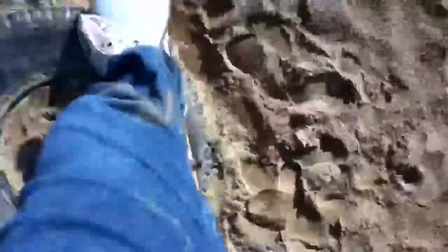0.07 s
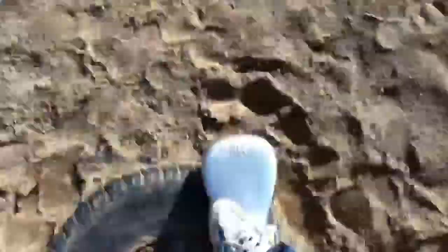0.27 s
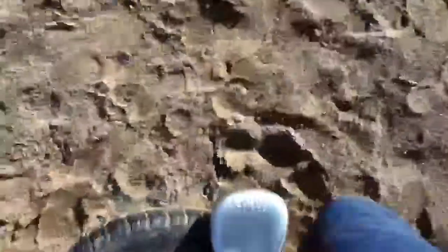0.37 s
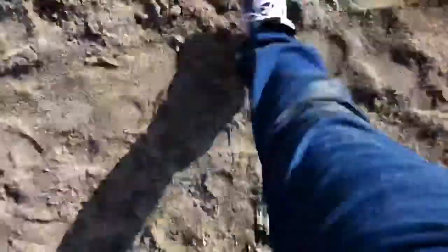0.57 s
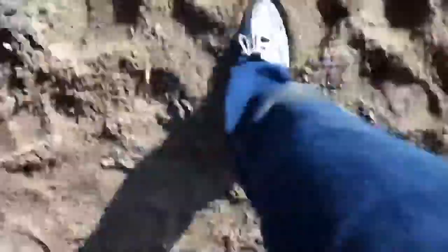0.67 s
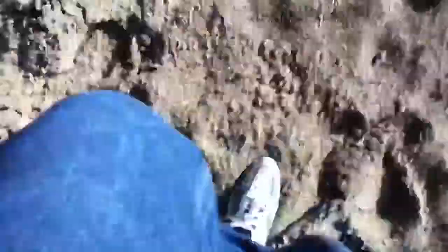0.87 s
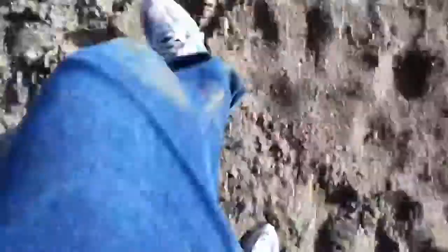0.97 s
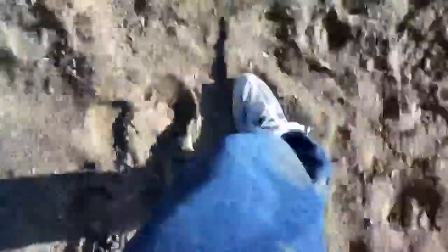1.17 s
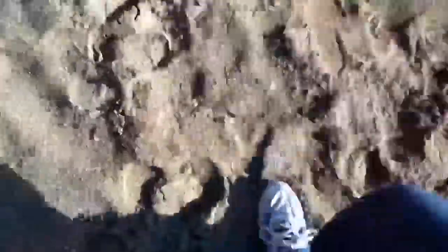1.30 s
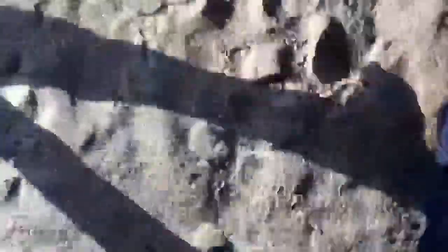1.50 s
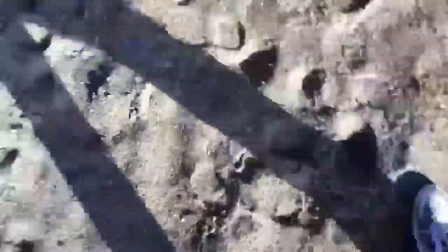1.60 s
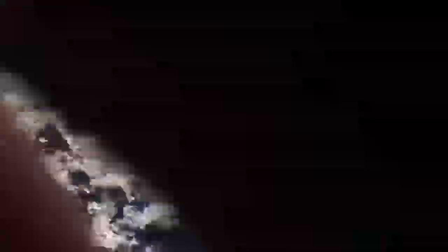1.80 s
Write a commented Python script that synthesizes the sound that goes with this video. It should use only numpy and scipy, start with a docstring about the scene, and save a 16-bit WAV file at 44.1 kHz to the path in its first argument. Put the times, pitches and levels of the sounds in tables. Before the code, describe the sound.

A hollow double knock that rings briefly, then soft footsteps on dry dirt in light wind.

```python
"""Stepping down onto dry dirt

Someone steps down from a small vehicle and walks off. A foot knocks twice on a hollow part
by the tyre, which rings on and rumbles when rubbed. Soles scuff the grit, small stones click,
soft thumps follow, and light wind buffets the microphone."""
import sys
import numpy as np
from scipy import signal
from scipy.fft import rfft, irfft
from scipy.io import wavfile

SR = 44100
rng = np.random.default_rng(int(sys.argv[2]) if len(sys.argv) > 2 else 0)


def wrap_up_sound(samples):
    """Save the sound to the file named by the first command line argument, as 16-bit audio."""
    columns = np.atleast_2d(samples).T
    # keep every value between -1 and 1, then stretch to whole-number steps
    tamed = np.clip(columns, -1, 1)
    steps = np.round(tamed * 32767).astype(np.int16)
    wavfile.write(sys.argv[1], SR, steps)


N = 81585
T = np.arange(N) / SR
HZ = np.fft.rfftfreq(N, 1 / SR)
TILT_OCTAVES = np.log2(np.maximum(HZ, 300) / 1000)  # re 1 kHz, flat below 300 Hz

# Long modes of the hollow body. Each row: frequency in Hz, level in dB, T60 in seconds.
HOLLOW_MODES = [(233.3, -31.5, 1), (279, -29, 0.99), (295, -30, 0.71), (346.5, -38, 0.54),
                (376, -33.5, 0.94), (415, -24, 0.35), (441, -45, 0.39), (450, -35.5, 0.98),
                (494, -29, 0.74), (519, -33, 0.71), (547, -29, 0.41), (626, -31.5, 0.22),
                (715, -40.5, 0.67), (926, -41.5, 0.6), (1100, -51, 0.42), (1186, -44, 0.23)]


def amp(db):
    """Decibels to gain."""
    return 10 ** (np.asarray(db) / 20)


def unit_rms(x):
    """Scale to an rms of one."""
    return x / np.sqrt(np.mean(x ** 2) + 1e-20)


def curve_at(points, hz):
    """Interpolate (Hz, value) rows over log frequency."""
    points_hz, values = np.transpose(points)
    return np.interp(np.log(hz + 1), np.log(points_hz), values)


def colour(x, gain_db):
    """Filter by a gain per FFT bin; unit rms."""
    return unit_rms(irfft(rfft(x) * amp(gain_db), N))


def noise(spectrum):
    """Unit-rms noise shaped by (Hz, dB) rows."""
    return colour(rng.standard_normal(N), curve_at(spectrum, HZ))


def add(mix, start_s, sound):
    """Mix a sound in from start_s."""
    part = mix[max(round(start_s * SR), 0):]
    part += sound[:len(part)]


def envelope(start_s, rise_s, hold_s, decay_s):
    """Linear rise, hold, exponential decay."""
    attack = np.clip((T - start_s) / rise_s, 0, 1)
    return attack * np.exp(-np.maximum(T - start_s - rise_s - hold_s, 0) / decay_s)


def pulse(peak_s):
    """Smooth bump that reaches one at peak_s."""
    return T / peak_s * np.exp(1 - T / peak_s)


def ring(modes):
    """Decaying sines of a struck object."""
    return sum(amp(db - 60 * T / t60_s) * np.sin(2 * np.pi * hz * T) for hz, db, t60_s in modes)


def grains(rate_per_s=4600, spread_db=3):
    """Friction: dense tiny slips of uneven size."""
    size = amp(spread_db * np.minimum(rng.exponential(1, N), 4))
    return size * rng.choice([-1, 1], N) * (rng.random(N) < rate_per_s / SR)


def knocks():
    """Each blow crunches, clacks, flexes the panel for a few cycles and rings the hollow body."""
    # The first two blows merge into one knock. Each row: start in seconds, panel level in dB,
    # panel pitch in Hz, swell time in seconds, clack and crunch levels in dB,
    # crunch rise and decay in seconds, ring level in dB.
    blows = [(0.2273, -7, 450, 0.0016, -21, -31.5, 0.0014, 0.006, -6),
             (0.2317, -3.5, 447.5, 0.005, -18, -23, 0.0019, 0.0047, -0.5),
             (0.2739, -1.5, 415, 0.0058, -19, -19.5, 0.00028, 0.0024, -0.5)]
    # Short modes at the contact. Each row: frequency in Hz, level in dB, T60 in seconds.
    clack_modes = [(276, 2.5, 0.054), (625.7, 1.5, 0.12), (683, -6, 0.13), (928, -11.5, 0.056),
                   (1116, -7, 0.065), (1210, -12, 0.12), (1772, -14, 0.028), (2320, -15.5, 0.05),
                   (4090, -29, 0.032), (6000, -19, 0.016), (6780, -22, 0.06)]
    # Each row: frequency in Hz, level in dB.
    crunch_spectrum = [(30, -21), (200, -26), (700, 7.5), (1500, -1.5), (3000, -2.5), (6000, -11),
                       (9000, -14), (12000, -26.5), (16000, -46)]
    radiation = signal.butter(1, 198, "high", fs=SR, output="sos")  # a small body radiates little bass
    ring_rise_s, choke_s = 0.0048, 0.016  # the next blow chokes the long modes
    clack, hollow = ring(clack_modes), ring(HOLLOW_MODES)
    ends_s = [blow[0] for blow in blows[1:]] + [T[-1]]
    out = np.zeros(N)
    for blow, end_s in zip(blows, ends_s):
        start_s, panel_db, panel_hz, swell_s, clack_db, crunch_db, rise_s, decay_s, ring_db = blow
        panel = -pulse(swell_s) ** 5 * np.sin(2 * np.pi * panel_hz * T)
        crunch = noise(crunch_spectrum) * envelope(0, rise_s, 0, decay_s)
        ringing = hollow * envelope(0, ring_rise_s, end_s - start_s, choke_s) + body_wash(ring_rise_s)
        struck = amp(panel_db) * panel + amp(clack_db) * clack + amp(ring_db) * ringing
        add(out, start_s, signal.sosfilt(radiation, struck) + amp(crunch_db) * crunch)
    return out


def body_wash(rise_s, level_db=-24.5):
    """The hollow body's dense weak modes; the treble dies first."""
    # Each row: frequency in Hz, level in dB.
    spectrum = [(60, -32), (150, -10), (240, 2.5), (500, 0), (830, -8.5), (1150, -7), (1800, -18.5),
                (4000, -22.5), (7000, -31), (15000, -64)]
    # Each row: frequency in Hz, T60 in seconds.
    decay_times = [(200, 0.83), (500, 0.89), (1000, 0.53), (2700, 0.32), (7000, 0.083)]
    hz, time_s, bands = signal.stft(noise(spectrum), SR, nperseg=512)
    bands *= amp(-60 * time_s / curve_at(decay_times, hz)[:, None])
    tail = signal.istft(bands, SR, nperseg=512)[1][:N]
    return amp(level_db) * np.minimum(T / rise_s, 1) * tail


def rubs(foot_damping_s=0.1, ring_db=-8):
    """Friction rumbles in the hollow body, partly damped by the rubbing foot."""
    # Each row: start, rise, hold and decay in seconds, level in dB, tilt in dB per octave.
    strokes = [(0.007, 0.058, 0.0055, 0.0042, -53.5, 8), (0.062, 0.0017, 0.064, 0.0085, -40, 0.5),
               (0.13, 0.016, 0.044, 0.024, -41.5, 4), (0.805, 0.019, 0.012, 0.021, -38.5, -2.5),
               (0.855, 0.0015, 0.075, 0.13, -38.5, 2)]
    # Each row: frequency in Hz, level in dB.
    spectrum = [(60, -41), (150, -11), (270, 3), (500, -1.5), (700, -5), (950, -10), (1300, -21),
                (2000, -28.5), (3500, -43.5), (12000, -62)]
    slips = grains()
    damped_modes = ring(HOLLOW_MODES) * np.exp(-T / foot_damping_s)
    resonance = irfft(rfft(slips) * rfft(damped_modes), N)
    rumble = colour(slips, curve_at(spectrum, HZ)) + amp(ring_db) * unit_rms(resonance)
    return sum(amp(db) * envelope(*timing) * colour(rumble, tilt * TILT_OCTAVES)
               for *timing, db, tilt in strokes)


def thumps(slap_width_s=0.00032):
    """Short high-passed pushes swing once or twice, each with a dull slap on top."""
    # Each row: time in seconds, push level in dB, push rise in seconds, bass edge in Hz,
    # slap level in dB.
    pushes = [(1.191, -27, 0.00079, 196, -34), (1.245, -31, 0.0078, 54, -65),
              (1.354, -16.5, 0.0013, 106, -22.5), (1.4, -26, 0.0016, 149, -69),
              (1.461, -34, 0.00056, 170, -57), (1.576, -35, 0.00082, 172, -63),
              (1.761, -33, 0.0019, 69, -61), (1.796, -27.5, 0.0013, 68, -50),
              (1.802, -25.5, 0.0014, 170, -46), (1.846, -30, 0.0017, 170, -47)]
    slap_time = T / slap_width_s - 4
    slap = (1 - slap_time ** 2) * np.exp(-slap_time ** 2 / 2)
    out = np.zeros(N)
    for time_s, push_db, rise_s, edge_hz, slap_db in pushes:
        bass_cut = signal.cheby1(3, 1.5, edge_hz, "high", fs=SR, output="sos")
        swing = signal.sosfilt(bass_cut, pulse(rise_s) ** 2)
        add(out, time_s - rise_s / 2, amp(push_db) * swing)
        add(out, time_s - 4 * slap_width_s, amp(slap_db) * slap)
    return out


def scuffs():
    """Soles crush and drag dry crumbs of earth."""
    # Each row: start, rise, hold and decay in seconds, level in dB, tilt in dB per octave.
    strokes = [(0.214, 0.015, 0.0025, 0.0057, -34.5, 2), (0.316, .006, 0.011, 0.01, -54, 9),
               (0.538, 0.0057, 0.0043, 0.017, -44.5, 2), (0.569, 0.0039, 0.0056, 0.014, -50.5, 2.5),
               (0.598, 0.0016, 0.0068, 0.014, -44, 3.5), (0.737, 0.0056, 0.031, 0.0079, -46, 0),
               (0.768, 0.032, 0.054, 0.072, -50.5, 2), (1.111, 0.033, 0.0031, 0.083, -50.5, 2.5),
               (1.186, 0.039, 0.0085, 0.033, -46.5, 0), (1.303, 0.0012, 0.018, 0.0082, -45.5, -4.5),
               (1.581, 0.098, 0.042, 0.038, -53, 3.5), (1.742, 0.013, .04, .08, -52.5, -4)]
    # Each row: frequency in Hz, level in dB.
    grit_spectrum = [(60, 0.5), (200, 2.5), (600, 10.5), (1000, 1), (1600, -1.5), (2600, -9), (4500, -18),
                     (8000, -27), (15000, -64)]
    grit_db = curve_at(grit_spectrum, HZ)
    return sum(amp(db) * envelope(*timing) * colour(grains(), grit_db + tilt * TILT_OCTAVES)
               for *timing, db, tilt in strokes)


def stones(rise_s=0.00071):
    """Small stones click and grate under a shoe, each in its own band."""
    # Each row: start in seconds, level in dB, centre in Hz, half-width in octaves, decay in seconds.
    clicks = [(0.2723, -31.5, 6190, 0.033, 0.002), (0.537, -54, 3000, 0.51, 0.005),
              (0.5995, -47.5, 3500, 0.37, 0.0034), (0.859, -43.5, 1860, 0.2, 0.0057),
              (1.051, -52, 1570, 0.12, 0.023), (1.352, -51, 3120, .25, .002),
              (1.4625, -50, 5900, 1, 0.0048), (1.479, -58.5, 5900, 0.74, 0.0067),
              (1.585, -49, 6850, 0.37, 0.0032), (1.755, -54.5, 1384, 0.084, 0.099)]
    out = np.zeros(N)
    for start_s, db, centre_hz, half_width_oct, decay_s in clicks:
        offset_oct = np.log2((HZ + 1) / centre_hz)
        band_db = -10 * np.log10(1 + (offset_oct / half_width_oct) ** 4)
        out += amp(db) * envelope(start_s, rise_s, 0, decay_s) * colour(rng.standard_normal(N), band_db)
    return out


def wind(air_db=-55.5):
    """Low buffeting at the microphone over steady outdoor air."""
    # Each row of both spectra: frequency in Hz, level in dB.
    buffet_spectrum = [(20, -35), (45, -11), (75, -6), (130, 0.5), (200, -5), (400, -16), (1500, -38),
                       (8000, -83)]
    air_spectrum = [(30, -23), (130, 5), (400, -8), (800, -12.5), (1600, -16), (4000, -23.5), (9000, -27.5),
                    (15500, -30.5)]
    # Each row: time in seconds, level in dB.
    gusts = [(0, -47.5), (.25, -51), (.5, -56), (.7, -58.5), (.9, -51.5), (1.15, -56.5), (1.4, -51),
             (1.65, -54.5), (1.85, -45.5)]
    gust_db = np.interp(T, *np.transpose(gusts))
    return amp(gust_db) * noise(buffet_spectrum) + amp(air_db) * noise(air_spectrum)


def scene():
    """All sources, mono."""
    return (knocks() + rubs() + scuffs() + thumps() + stones() + wind())[None]


def record(dry):
    """Microphone bass cut and recorder band limit."""
    low_hz, high_hz = 39, 15850
    bass_cut = signal.butter(2, low_hz, "high", fs=SR, output="sos")
    band_limit = signal.firwin(511, high_hz, window=("kaiser", 9), fs=SR)
    return signal.oaconvolve(signal.sosfilt(bass_cut, dry), band_limit[None], "same")


dry = scene()
out = record(dry)
wrap_up_sound(out)
```